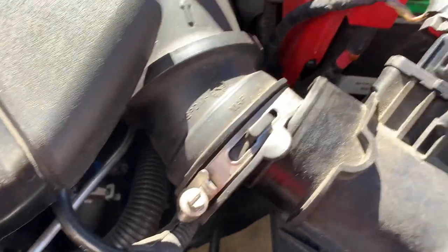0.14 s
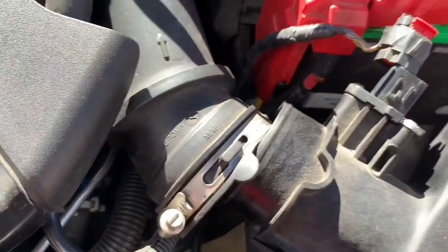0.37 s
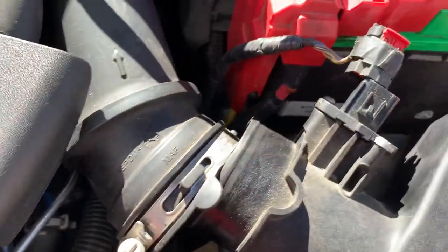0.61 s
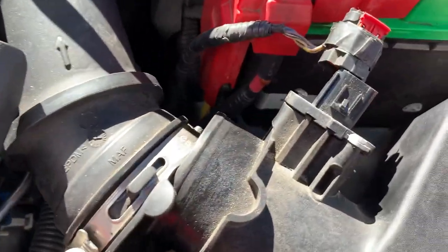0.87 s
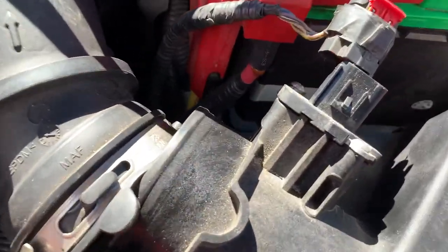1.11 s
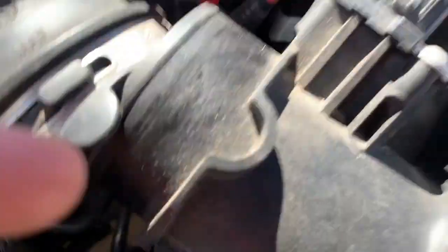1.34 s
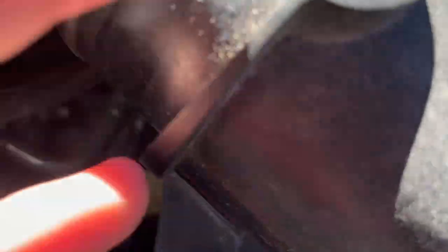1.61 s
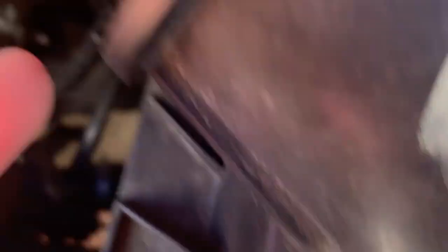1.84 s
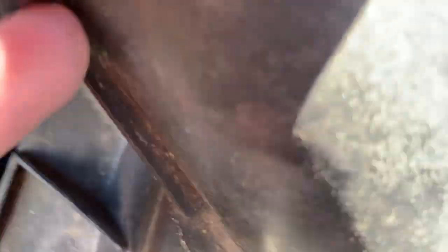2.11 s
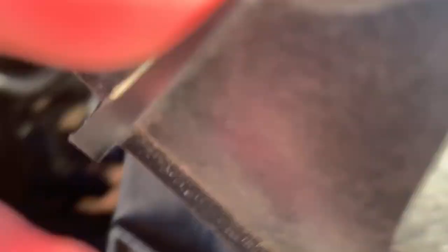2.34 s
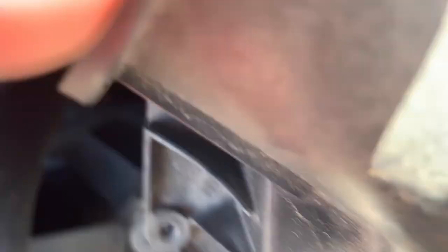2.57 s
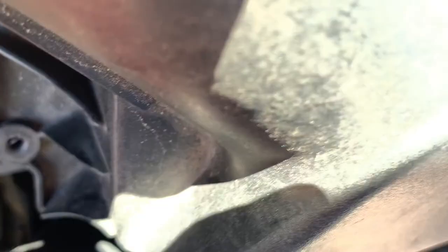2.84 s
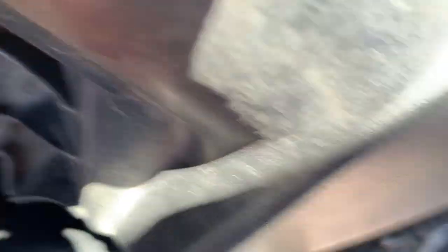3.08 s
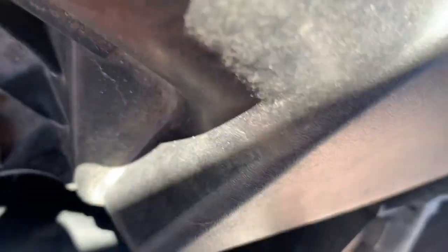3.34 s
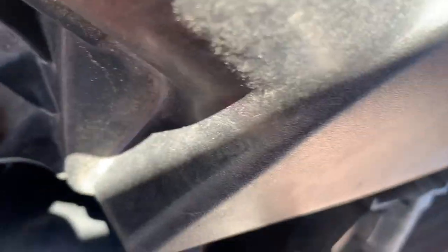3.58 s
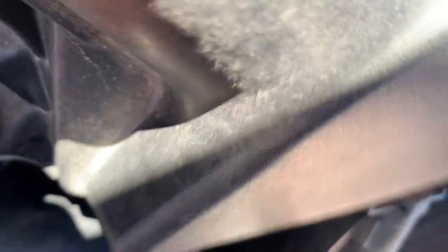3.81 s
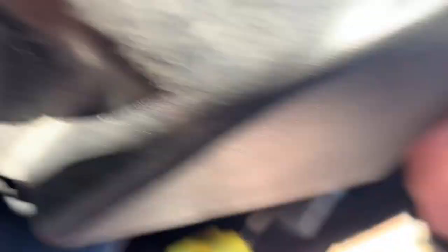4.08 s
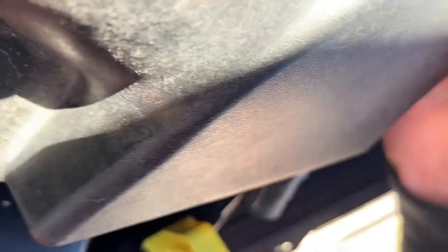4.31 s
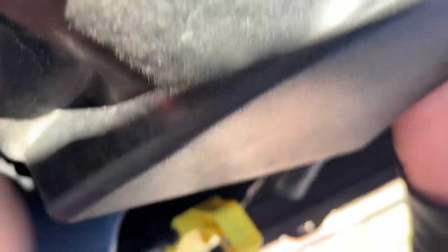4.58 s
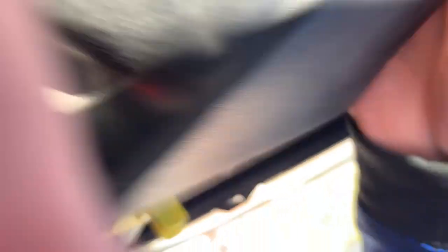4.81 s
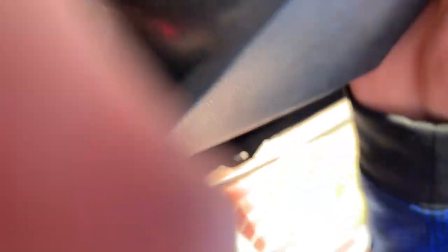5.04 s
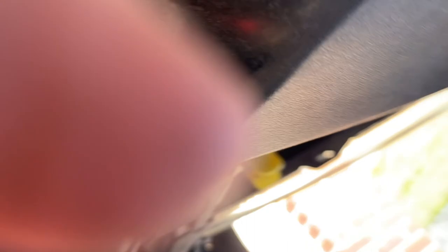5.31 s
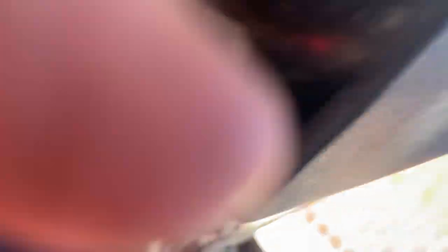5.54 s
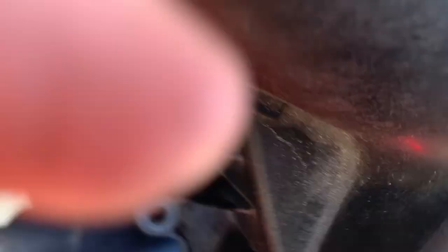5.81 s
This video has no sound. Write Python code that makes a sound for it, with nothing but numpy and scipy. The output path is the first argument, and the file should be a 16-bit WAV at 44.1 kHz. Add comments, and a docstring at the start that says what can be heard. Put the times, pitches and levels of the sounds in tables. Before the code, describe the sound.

Very close stereo pickup in an open engine bay outdoors. Fingers brush plastic in short dry strokes; a hollow knock comes early, another duller one near one second, then mostly quiet rubbing. Clicks and scrapes gather after three seconds, followed by strong knocks and a rattling burst of snaps, ending in rubbing and small taps. Low rumble underneath.

```python
"""In an engine bay, hands work a plastic air duct loose right beside a two-port microphone.
Skin and plastic rub in strokes of shaped noise; parts tap and snap as short blows ring the duct's modes.
The hollow housing thumps as gliding sines, small tabs flick free and ring, and plastic judders in slips.
The bay answers with a short dense tail, and a low outdoor rumble of filtered noise lies beneath."""
import sys
import numpy as np
from scipy import signal
from scipy.fft import rfft, irfft, next_fast_len
from scipy.io import wavfile
from scipy.ndimage import uniform_filter1d, map_coordinates

SR = 44100
rng = np.random.default_rng(int(sys.argv[2]) if len(sys.argv) > 2 else 0)


def to_wav(s):
    """Save 16-bit WAV."""
    ch = np.atleast_2d(s).T  # columns
    pcm = np.round(np.clip(ch, -1, 1) * 32767)  # PCM
    wavfile.write(sys.argv[1], SR, pcm.astype(np.int16))


def rack_gain(trim_db):
    """Turn a fader trim in dB into the linear factor to multiply a signal by."""
    fader = np.asarray(trim_db, float)
    return 10 ** (fader / 20)


N = 261072  # length in samples

# How loud the outdoor rumble is. Each row: time in seconds, level in dB before it wavers.
RUMBLE_LEVEL = [(0.0, -44.5), (0.46, -45.5), (1.4, -47), (2.2, -46), (2.9, -46.5), (4.01, -45), (4.1, -42),
                (5.92, -44)]
# Colour of the rumble and faint hiss of the place. Each row: frequency in Hz, relative level in dB.
GROUND_COLOUR = [(15, -78), (25, 11), (58, 10), (130, 7.5), (591, -30.5), (1000, -31.5), (4000, -40),
                 (16000, -71)]
# How alike the noise is at the two ports. Each row: frequency in Hz, likeness (1 = the same).
LIKENESS = [(60, 0.9), (300, 0.87), (1200, 0.097), (5500, 0.11), (6800, 0.96), (16000, 1)]
# Where the hands are. Each row: time in seconds, lag of the left in ms, how much louder the left is in dB.
HAND_PLACE = [(0, 0.24, -1), (.9, 0.29, 1.5), (1.7, 0.21, 2), (2.6, 0.25, 4), (3.2, 0.37, 5.5),
              (3.36, -0.25, 4.5), (4.4, -0.2, 9), (5.3, -0.42, 4.5), (5.92, -0.15, 4.5)]
# Rubbing strokes. Each row: start in seconds, length in seconds, slide as skin hiss in dB (before the
# hiss boost), pressure as housing creak in dB.
RUB_STROKES = [(0.039, 0.18, -57, -91), (0.124, 0.062, -48, -61), (0.187, 0.11, -56, -41.5),
               (0.443, 0.077, -54.5, -53.5), (0.558, 0.2, -57.5, -61.5), (0.899, 0.028, -55, -65),
               (1.117, 0.11, -61.5, -48), (1.23, 0.075, -56, -72), (1.311, 0.07, -50.5, -68),
               (1.508, 0.13, -62.5, -66.5), (1.722, 0.073, -52, -51.5), (1.846, 0.21, -52, -60.5),
               (1.955, 0.1, -58, -53.5), (2.072, 0.051, -54, -62), (2.184, 0.19, -49, -65),
               (2.413, 0.082, -54, -54), (2.486, 0.12, -58, -49), (2.685, 0.13, -65, -44.5),
               (2.932, 0.082, -59.5, -48.5), (3.155, 0.098, -64, -40), (3.325, 0.087, -50, -42.5),
               (3.487, 0.31, -58, -45.5), (4.007, 0.062, -50, -45), (4.213, 0.058, -47.5, -53),
               (4.365, 0.15, -62, -47.5), (4.559, 0.075, -50, -58), (4.681, 0.027, -59, -24),
               (4.712, 0.12, -49, -35), (4.844, 0.14, -59, -42), (4.977, 0.12, -50.5, -55.5),
               (5.178, 0.15, -50.5, -43), (5.279, 0.051, -60.5, -41.5), (5.352, 0.12, -56.5, -39.5),
               (5.469, 0.09, -48, -39.5), (5.528, 0.14, -52, -47.5), (5.672, 0.068, -48.5, -45.5)]
# The light touch that stays between strokes. Each row: time in seconds, skin hiss in dB before the boost.
LIGHT_TOUCH = [(0, -82), (.32, -65), (.55, -66), (.76, -77), (1.07, -72), (1.39, -60), (1.47, -79),
               (1.66, -73), (1.82, -65.5), (2.4, -66.5), (2.66, -72), (3.02, -80.5), (3.85, -76.5),
               (4.3, -71.5), (4.65, -61.5), (5.12, -65), (5.78, -72)]
# Colour of skin hiss and tap sizzle. Each row: frequency in Hz, relative level in dB per Hz.
HISS_COLOUR = [(900, -8.5), (1600, 0), (2600, -2.5), (4000, -6), (5000, -5), (6000, -10.5), (7000, -4.5),
               (9300, -5), (10500, -4.5), (11500, -11), (13500, -10.5), (15800, -12.5)]
# Modes of the plastic duct. Each row: frequency in Hz, width in Hz, relative level in dB.
DUCT_MODES = [(433.7, 38.5, 12.5), (547, 105, 9.5), (880, 378, 6.5), (1253, 106, 11), (1804, 1040, 3),
              (2360, 516, 2), (3060, 298, 4), (3210, 1580, -2.5), (3970, 970, -5.5), (4550, 510, -9)]
# Modes of the hollow housing. Each row: frequency in Hz, width in Hz, relative level in dB.
HOUSING_MODES = [(181, 149, -2), (236.7, 16.6, 2.5), (332, 7.2, -7), (476, 55, -6)]
# Taps and snaps. Each row: time in seconds, peak in dB before left-right balance, sizzle in dB relative
# to that peak (before boost and colour), hardness as tilt in dB per octave, contact time in seconds.
TAP_BLOWS = [(0.049, -36.5, -5.5, 0.5, 0.0074), (0.149, -26.5, -9, 1, 0.0049),
             (0.219, -15.5, -22.5, -5.5, 0.0052), (0.285, -33.5, -4.5, 4, 0.011),
             (0.916, -16.5, -31, -7.5, 0.0062), (1.025, -35, -7, 5.5, 0.0093),
             (1.151, -36.5, -30, 0.5, 0.012), (1.182, -36.5, -36, -4, 0.0066),
             (1.224, -33.5, -11, 0.5, 0.012), (1.486, -41.5, -41, 3.5, 0.0019),
             (1.621, -40.5, -2.5, 2.5, 0.0063), (2.198, -38.5, -6, -28, 0.0099),
             (2.584, -20.5, -6, 5.5, 0.0035), (2.708, -36, -13, -3, 0.0083),
             (2.729, -38.5, -27, -3, 0.0088), (2.886, -44.5, -35, -5, 0.0094),
             (2.921, -34, -27, -2.5, 0.0059), (3.162, -33, -13, 0, 0.034), (3.221, -22.5, -13, 1.5, 0.0026),
             (3.225, -21.5, -15, 2, 0.0045), (3.274, -41.5, -47, 4, 0.0047), (3.358, -26, -21, 1, 0.0063),
             (3.541, -35, -26, -3.5, 0.017), (3.576, -38, -9, -2, 0.019), (3.605, -34, -8.5, -4, 0.019),
             (3.646, -45, -24, -8, 0.0032), (3.702, -33, -23, -5.5, 0.007), (3.728, -31.5, -16, -2, 0.014),
             (3.861, -31, -26, -9, 0.006), (3.893, -27, -22.5, -11, 0.0079), (4.002, -35, -15, -5, 0.002),
             (4.013, -10.5, -36, -1.5, 0.0041), (4.373, -10, -26, 0.5, 0.0049), (4.463, -42, -8, 5, 0.0052),
             (4.682, -21.5, -12, 0.5, 0.012), (4.718, -28.5, -19, 5, 0.013), (4.728, -9, -12, -0.5, 0.0045),
             (4.736, -12.5, 0.5, 5.5, 0.0091), (4.748, -30, -16, 6, 0.0078),
             (4.811, -32, -18, 18.5, 0.0044), (4.828, -20.5, -7, -3.5, 0.003),
             (4.842, -27, -14, 6.5, 0.019), (4.892, -33.5, -3, 14.5, 0.0023), (5.225, -31, -28, -13, 0.013),
             (5.251, -23.5, -17, -1.5, 0.0089), (5.362, -18.5, -24, -0.5, 0.0014),
             (5.511, -26.5, -29, -8, 0.0034), (5.752, -21.5, -23, -6, 0.0056),
             (5.766, -24, -10, 10, 0.0029)]
# How long the engine bay rings. Each row: frequency in Hz, time to fall 60 dB in seconds.
BAY_DECAY = [(150, 0.078), (800, 0.098), (8000, 0.025)]
# Pushes that swing the housing. Each row: start in seconds, level in dB before the swing's shape,
# starting pitch in Hz, time driven in seconds.
HOUSING_THUMPS = [(0.153, -39.5, 173, 0.017), (0.197, -32, 138, 0.015), (0.2197, -11, 201.4, 0.0092),
                  (0.23, -15, 122, 0.012), (0.442, -37.5, 244, 0.015), (1.176, -39, 147, 0.033),
                  (1.211, -34, 136.6, 0.036), (2.33, -25, 74.5, 0.024), (2.595, -24.5, 87.6, 0.02),
                  (2.991, -36, 74, 0.014), (3.176, -34.5, 174, 0.029), (3.739, -33, 69, 0.027),
                  (3.864, -13.5, 191, 0.011), (3.881, -24, 93, 0.025), (4.021, -11, 221.4, 0.019),
                  (4.036, -26, 76.5, 0.022), (4.38, -10.5, 220.4, 0.019), (4.394, -26, 72.4, 0.015),
                  (4.687, -25, 223, 0.028), (4.726, -11, 242.7, 0.0061), (4.748, -14, 60.3, 0.012),
                  (4.774, -22.5, 246, 0.011), (4.85, -14.5, 235, 0.027), (4.883, -24.5, 66, 0.017),
                  (5.249, -30.5, 242.3, 0.035), (5.366, -23.5, 235, 0.022), (5.421, -31.5, 236, 0.016),
                  (5.53, -30.5, 67, 0.025), (5.699, -32, 82, 0.016), (5.757, -31, 279, 0.017)]
# Small hard tabs flicking free. Each row: start in seconds, level in dB before onset and balance,
# pitch in Hz, time to fall 60 dB in seconds.
TAB_FLICKS = [(0.2195, -12.5, 510, 0.032), (4.0135, -16, 3020, 0.016), (4.3745, -25, 3020, 0.013),
              (0.445, -34.5, 620, 0.035), (2.585, -20.5, 1780, 0.019), (3.2255, -27, 4800, 0.012),
              (3.227, -24, 1320, 0.025), (3.358, -20, 1250, 0.031), (3.396, -30, 1900, 0.015),
              (3.2245, -18.5, 12400, 0.012)]
# Plastic juddering on plastic. Each row: start in seconds, length in seconds, level of the lowest tone
# in dB, first slips per second, last slips per second.
JUDDER_RUNS = [(2.74, 0.055, -38, 296, 162), (3.54, 0.088, -41.5, 205, 186),
               (3.685, 0.061, -41.5, 184, 210), (5.575, 0.044, -36.5, 310, 230)]

REST_CREAK_DB, REST_SCRAPE_DB = -61, -65.5  # creak between strokes; floor of the scrape
SLIDE_SHARE, SCRAPE_DB = 0.52, -2  # the scrape grows with slide and with pressure
CHANGE_S = 0.021  # strokes start and stop over about 20 ms
SWELL_DB, FADE_DB = 3, 1.5  # a stroke's rise over its ends, and its sinking along its length
HISS_BOOST_DB = 4.5
MODE_SCATTER_DB, MODE_SHIFT = 2, .03  # each blow lands elsewhere on the duct; shift is a fraction of pitch
LEAD_S, LEAD_DB = .004, -16  # faint noise that swells just before each strike
STRIKE_S = .014  # the shorter the contact, the more the sharp strike stands out
TAP_LAG_SHARE = 0.52  # taps reach both ports closer together than the housing's swing
JUDDER_FALL_DB, JUDDER_JITTER = -6, 0.019  # step to each next overtone; unevenness of the slip rate


def unit(x):
    """Scale to rms 1."""
    return x / np.sqrt(np.mean(x ** 2) + 1e-20)


def along(points, hz):
    """Read a curve of (Hz, value) points on a log frequency axis."""
    f, v = np.transpose(points)
    return np.interp(np.log(hz + 1), np.log(f + 1), v)


def curves(rows):
    """One value per sample for each column after the time."""
    s, *cols = np.transpose(rows)
    return [np.interp(np.arange(N) / SR, s, c) for c in cols]


def balance():
    """Left and right gains over time, set by where the hands are."""
    left_louder_db = curves(HAND_PLACE)[1]
    return rack_gain(np.outer([.5, -.5], left_louder_db))


def wobble(rate):
    """A smooth random curve with rate knots a second."""
    knots = rng.standard_normal(int(N * rate / SR) + 4)
    return map_coordinates(knots, [np.arange(N) * rate / SR])


def filtered(x, response):
    """Pass x through a complex response of frequency."""
    m = next_fast_len(x.shape[-1] + 8192)
    return irfft(rfft(x, m) * response(np.fft.rfftfreq(m, 1 / SR)), m)[..., :x.shape[-1]]


def modes(table, hz):
    """Response of a set of resonances that ring after they are struck; their signs alternate."""
    total = 0
    for k, (centre, width, db) in enumerate(table):
        resonance = 1j * hz * width / (centre * centre - hz * hz + 1j * hz * width)
        total = total + (-1) ** k * rack_gain(db) * resonance
    return total


def rush(gain, grain_db, rate, patchy_db=0):
    """Stereo noise of rms 1, partly alike; its size scatters from grain to grain and in coloured patches."""
    z = signal.stft(rng.standard_normal((2, N)), nperseg=512)[2]
    field = uniform_filter1d(rng.standard_normal(z.shape[1:]), 3, 0)
    field = uniform_filter1d(field, 10, 1)
    pair = signal.istft(z * rack_gain(patchy_db * unit(field)), nperseg=512)[1][:, :N]
    pair = pair * rack_gain(grain_db * wobble(rate))

    def mid_side(hz):
        turn = np.arccos(np.clip(along(LIKENESS, hz), -1, 1)) / 2
        return gain(hz) * np.array([np.cos(turn), np.sin(turn)])

    mid, side = filtered(pair, mid_side)
    return unit(np.array([mid + side, mid - side]))


def background():
    """Far traffic rumble and the faint hiss of the place: coloured noise that slowly wavers."""
    level = rack_gain(curves(RUMBLE_LEVEL)[0] + 1.8 * wobble(3.2))
    return level * rush(lambda hz: rack_gain(along(GROUND_COLOUR, hz)), grain_db=4.0, rate=18)


def slips(rate, scatter_db):
    """Sparse stick-slip jolts, a few much larger than the rest, sounding the duct."""
    happens = rng.random(N) < rate / SR
    size = rack_gain(scatter_db * np.minimum(rng.exponential(size=N), 2.5))
    jolts = happens * size * rng.choice([-1, 1], N)
    return unit(filtered(jolts, lambda hz: modes(DUCT_MODES, hz) / (1 + 1j * hz / 3000)))


def rubbing():
    """Skin slides with a fine hiss; plastic catches in grains that sound the duct and the housing."""
    hiss_db, creak_db = curves(LIGHT_TOUCH)[0], np.full(N, float(REST_CREAK_DB))
    for s, length, slide_db, press_db in RUB_STROKES:
        span = slice(round(s * SR), round((s + length) * SR))
        u = np.linspace(-1, 1, span.stop - span.start)
        shape_db = -SWELL_DB * u ** 2 - FADE_DB * u / 2
        hiss_db[span] = slide_db + shape_db
        creak_db[span] = press_db + shape_db
    scrape_db = SCRAPE_DB + SLIDE_SHARE * hiss_db + (1 - SLIDE_SHARE) * creak_db
    scrape_db = np.maximum(scrape_db, REST_SCRAPE_DB)
    levels = np.array([hiss_db, scrape_db, creak_db])
    hiss_db, scrape_db, creak_db = uniform_filter1d(levels, round(CHANGE_S * SR), axis=1)

    flutter = wobble(30)  # shared by hiss and scrape
    hiss = rush(lambda hz: rack_gain(along(HISS_COLOUR, hz)), grain_db=1.2, rate=300, patchy_db=4.5)
    hiss = hiss * rack_gain(hiss_db + 1.5 * flutter)
    scrape = rush(lambda hz: modes(DUCT_MODES, hz), grain_db=3, rate=150, patchy_db=3)
    scrape = scrape * rack_gain(scrape_db + 3.5 * flutter)
    scrape += rack_gain(scrape_db - 4) * slips(rate=120, scatter_db=5)
    creak = rush(lambda hz: modes(HOUSING_MODES, hz) / (1 + (hz / 600) ** 4), grain_db=4, rate=70)
    creak = creak * rack_gain(creak_db + 2.5 * wobble(25))
    return rack_gain(HISS_BOOST_DB) * hiss + creak + scrape * balance()


def taps():
    """A faint noise lead-in, a sharp strike and a short rough contact ring the duct; bending waves bring
    low modes later. Returns the ringing body and the sizzle of the contact."""
    body, treble = np.zeros(N + SR), np.zeros(N + SR)
    t = np.arange(4096) / SR - .01  # the contact starts at 0
    after = np.maximum(t, 0)
    size = 1 - np.exp(-after / 0.0016) + rack_gain(LEAD_DB) * np.exp(-np.abs(t) / LEAD_S)

    def peak(x):
        return x / np.abs(x).max()

    for s, db, sizzle_db, tilt_db, contact in TAP_BLOWS:
        blow, fizz = rng.standard_normal((2, len(t))) * size
        strike = STRIKE_S / contact * np.exp(-((t - .0005) / .00004) ** 2)
        blow = blow * np.exp(-after / contact) + strike
        moved = np.array(DUCT_MODES) * [[1 + MODE_SHIFT * rng.standard_normal(), 1, 1]]
        moved[:, 2] += MODE_SCATTER_DB * rng.standard_normal(len(DUCT_MODES))

        def duct(hz):
            broad = 1.3j * hz / (hz + 400) / (1 + (hz / 3500) ** 2)  # the many unresolved modes
            spread = np.exp(-2j * np.pi * 0.1202 * np.sqrt(hz + 100))  # low notes arrive later
            hardness = (1 + 1j * hz / 400) ** (tilt_db / (20 * np.log10(2)))
            return (modes(moved, hz) + broad) * spread * hardness / (1 + 1j * hz / 7000) ** 2

        start = round((s - .0105) * SR)  # puts the sharp strike at s
        body[start:][:len(t)] += rack_gain(db) * peak(filtered(blow, duct))
        fizz = peak(fizz * np.exp(-(after / contact) ** 4))
        treble[start:][:len(t)] += rack_gain(db + sizzle_db + 14.5) * fizz

    def sizzle_colour(hz):
        return rack_gain(along(HISS_COLOUR, hz)) / (1 + (5500 / (hz + 1)) ** 4)

    return body[:N] * balance(), filtered(treble[:N], sizzle_colour)


def bay(x):
    """Short dense answer of the engine bay and bonnet: x smeared by decaying noise."""
    hz, t, z = signal.stft(rng.standard_normal((2, SR // 4)), SR, nperseg=256)
    fall = rack_gain(-60 * t / along(BAY_DECAY, hz)[:, None])
    tail = signal.istft(z * fall, SR, nperseg=256)[1]
    late = np.pad(x, (150, 0))[None]  # samples before the answer starts
    return signal.fftconvolve(late, tail / np.linalg.norm(tail[0]), axes=1)[:, :N]


def thumps():
    """The housing swings up within a cycle, holds while driven, drops as the hand damps it, then rings out."""
    out, t = np.zeros(N + SR), np.arange(SR // 4) / SR
    for s, db, hz, driven in HOUSING_THUMPS:
        rise = 1 - np.exp(-t * hz * 4.0)
        damped = 0.2 + 1.0 / (1 + np.exp(np.minimum((t - driven) / 0.0015, 50)))
        ring_out = rack_gain(-60 * np.maximum(t - driven, 0) / 0.22)
        phase = 2 * np.pi * hz * t * (1 - 0.65 * t)  # the pitch sags as the swing dies
        swing = np.sin(phase) + 0.16 * np.sin(2 * phase + 1)
        out[round(s * SR):][:len(t)] += rack_gain(db) * rise * damped * ring_out * swing
    return out[:N]


def flicks():
    """Each small tab rings at its own pitch with a weaker, shorter overtone."""
    out, t = np.zeros(N + SR), np.arange(4096) / SR
    for s, db, hz, t60 in TAB_FLICKS:
        overtone = np.sin(2 * np.pi * 1.63 * hz * t + rng.uniform(0, 2 * np.pi))
        ring = np.sin(2 * np.pi * hz * t) + 0.41 * rack_gain(-40 * t / t60) * overtone
        size = rack_gain(db - 60 * t / t60) * (1 - np.exp(-t / 0.00051))
        out[round(s * SR):][:len(t)] += size * ring
    return out[:N] * balance()


def judders():
    """A train of slips at a gliding, uneven rate: a short groan with a few overtones."""
    out, uneven = np.zeros(N), 1 + JUDDER_JITTER * wobble(120)
    for s, length, db, first_hz, last_hz in JUDDER_RUNS:
        span = slice(round(s * SR), round((s + length) * SR))
        u = np.linspace(0, 1, span.stop - span.start)
        rate = (first_hz + (last_hz - first_hz) * u) * uneven[span]
        phase = 2 * np.pi * np.cumsum(rate) / SR
        groan = sum(rack_gain(JUDDER_FALL_DB * k) * np.sin((k + 1) * phase) for k in range(4))
        out[span] += rack_gain(db) * np.sqrt(np.sin(np.pi * u)) * groan
    return out


def scene():
    """The body of a blow reaches one port a little before the other, by where the hands are."""
    body, sizzle = taps()
    body = body + flicks()
    swing = thumps() + judders()
    delay = np.outer([.5, -.5], curves(HAND_PLACE)[0]) * SR / 1000  # ms to samples, left then right
    near = []
    for x, d in zip(body, delay):
        blows = map_coordinates(x, [np.arange(N) - TAP_LAG_SHARE * d])
        near.append(blows + map_coordinates(swing, [np.arange(N) - d]))
    echo = rack_gain(-14) * bay(body.mean(0) + swing / 2)
    return np.array(near) + sizzle + rubbing() + echo + background()


def top_cut(x):
    """Nothing passes above the cut-off."""
    return signal.sosfilt(signal.butter(12, 16460, fs=SR, output="sos"), x)


def record(dry):
    """The left port hears the treble late; the deepest bass and the top roll off."""
    def late(hz):
        lag_s = .0002165 / (1 + (4200 / (hz + 1)) ** 8)  # grows to its full size above about 4200 Hz
        return np.exp(-2j * np.pi * hz * lag_s)

    def rolloff(hz):
        return 1 / (1 + (hz / 15900) ** 200) / (1 + (38 / (hz + 1)) ** 4)

    ports = np.array([filtered(dry[0], late), dry[1]])
    mix = filtered(ports, rolloff)
    return top_cut(mix)


dry = scene()
out = record(dry)
to_wav(out)
```